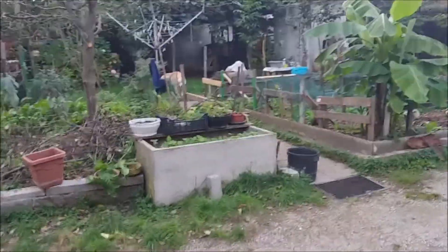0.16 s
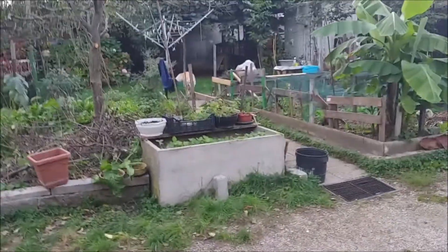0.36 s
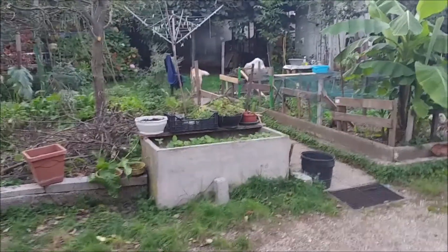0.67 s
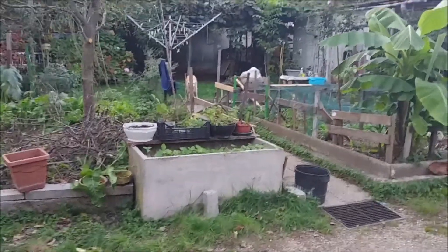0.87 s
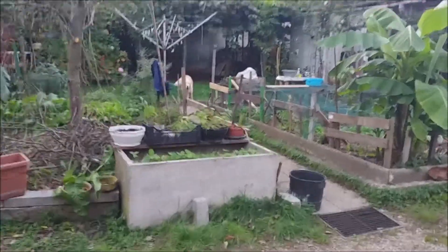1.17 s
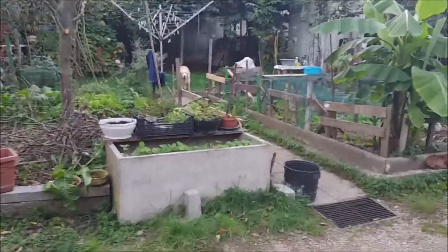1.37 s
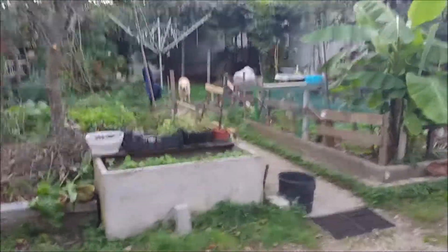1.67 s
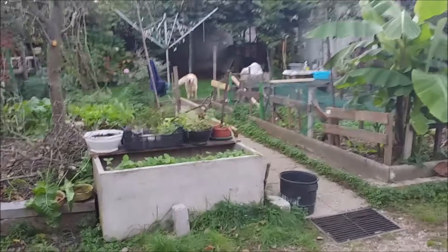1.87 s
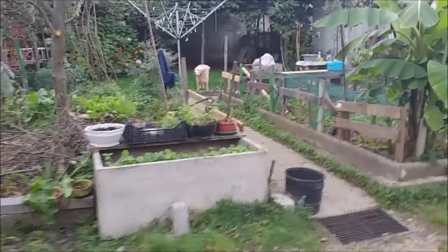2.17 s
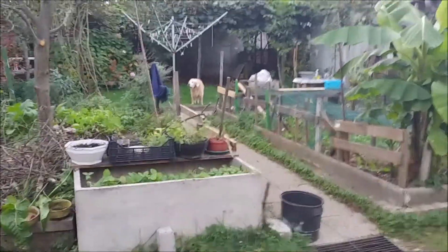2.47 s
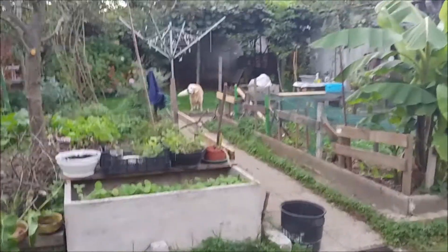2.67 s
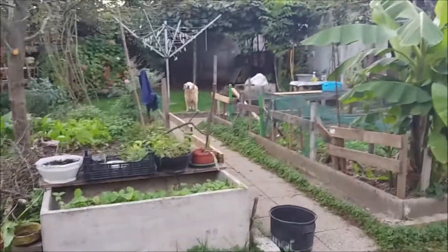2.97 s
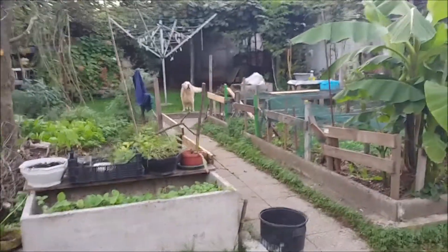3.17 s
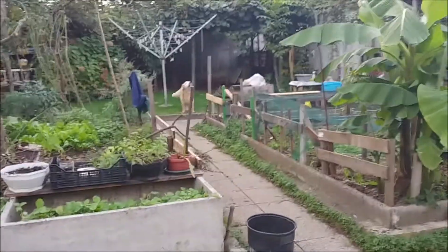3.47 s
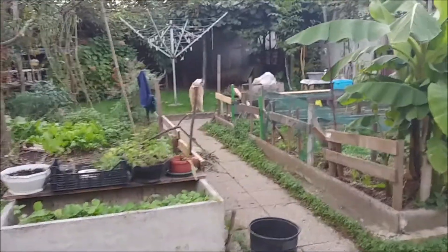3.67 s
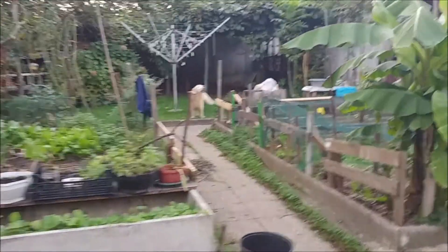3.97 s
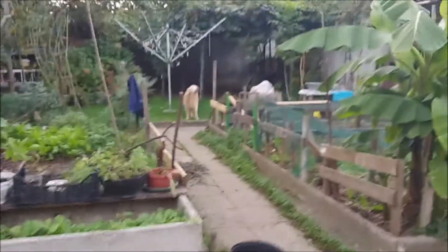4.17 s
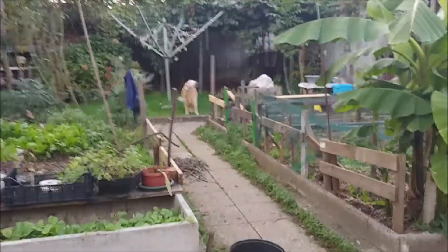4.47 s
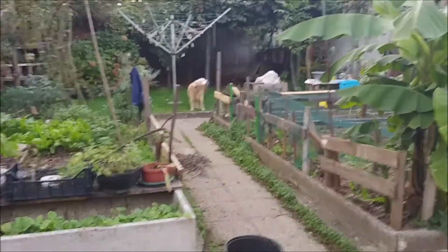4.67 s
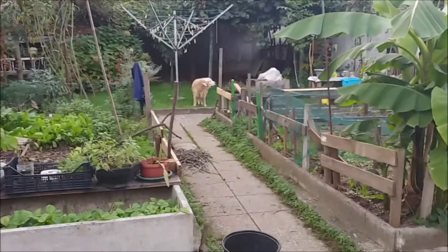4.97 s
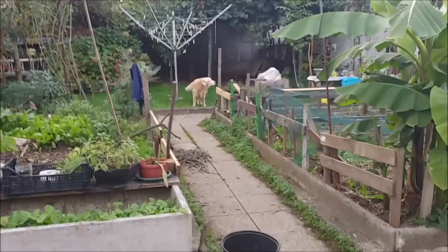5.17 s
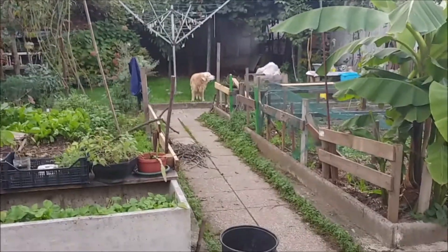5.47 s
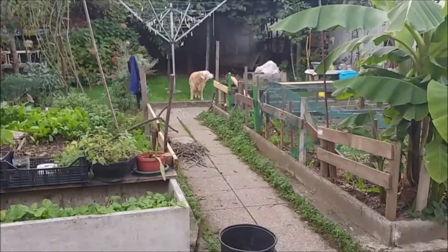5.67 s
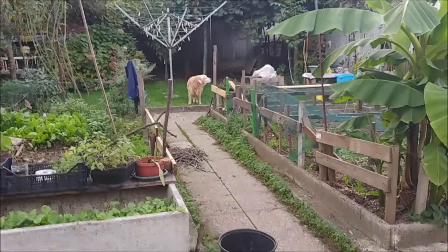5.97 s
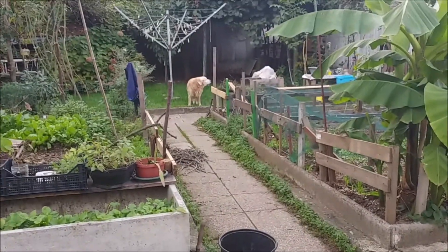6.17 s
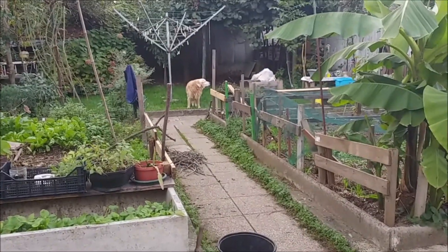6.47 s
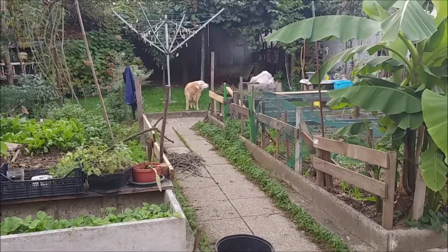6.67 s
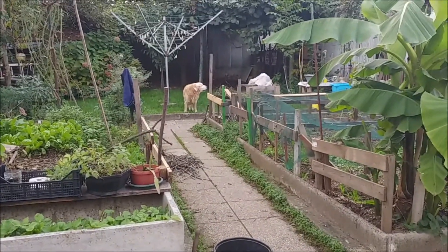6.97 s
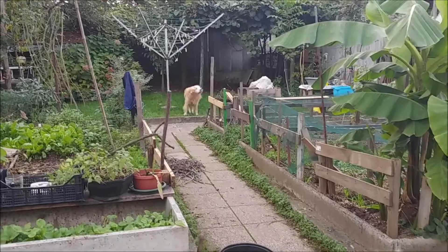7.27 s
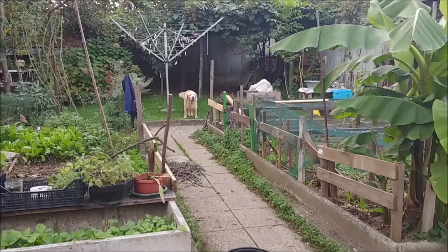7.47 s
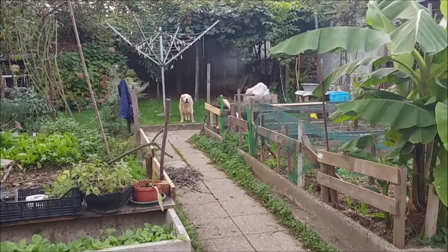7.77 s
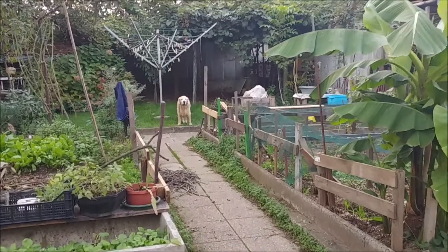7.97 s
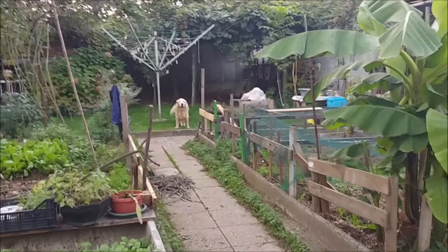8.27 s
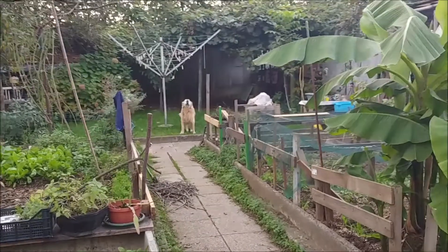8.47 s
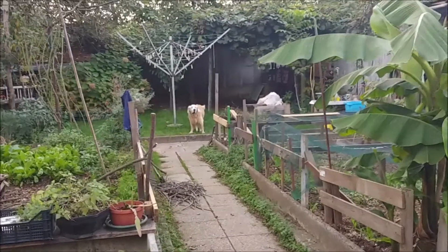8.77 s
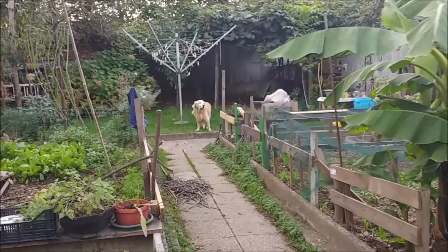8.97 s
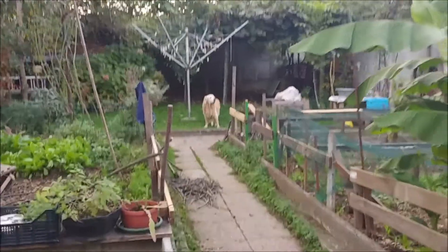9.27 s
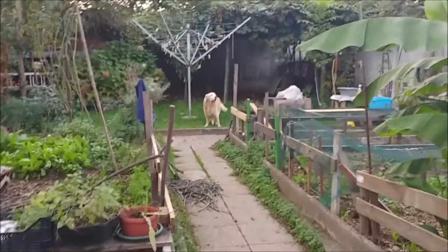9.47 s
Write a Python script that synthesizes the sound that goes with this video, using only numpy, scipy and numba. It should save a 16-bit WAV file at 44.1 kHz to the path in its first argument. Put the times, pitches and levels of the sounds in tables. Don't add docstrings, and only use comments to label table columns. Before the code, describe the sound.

Six hoarse, echoing dog barks across a back garden, over footsteps on gravel, low traffic rumble, a climbing lorry engine and small bird chips.

```python
import sys
import numpy as np
from scipy import signal
from scipy.fft import rfft, irfft, next_fast_len
from scipy.io import wavfile
from scipy.ndimage import uniform_filter1d, minimum_filter1d
from numba import njit

SR = 44100
rng = np.random.default_rng(int(sys.argv[2]) if len(sys.argv) > 2 else 0)


def wav_out(sig):
    wavfile.write(sys.argv[1], SR, np.round(np.clip(np.atleast_2d(sig).T, -1, 1) * 32767).astype(np.int16))


def decibels_to_gain(level_db):
    exponent = np.asarray(level_db, float) / 20
    return 10 ** exponent


N = 423801
ROAD_LAG = 20

# time in seconds, level in dB.
LORRY = [(0.8, -50.5), (1.32, -28), (1.94, -35), (2.4, -28), (2.8, -34), (3.31, -36), (3.75, -33.5),
         (4.0, -33), (4.5, -41), (4.85, -44.5), (5.05, -60), (6.1, -49.5), (6.6, -31), (7.1, -31.5),
         (7.5, -33.5), (8.2, -36), (9.6, -52)]


def level(x, db):
    return x * decibels_to_gain(db) / np.sqrt(np.mean(x ** 2))


def curve(rows, column):
    rows = np.array(rows)
    return np.interp(np.arange(N) / SR, rows[:, 0], rows[:, column])


def walk(rate):
    hold = int(SR / rate)
    steps = np.repeat(rng.standard_normal(N // hold + 1), hold)
    return 1.5 * uniform_filter1d(uniform_filter1d(steps, hold), hold)[:N]


def late(x, samples):
    return np.concatenate([np.zeros(samples), x[:len(x) - samples]])


def add(out, s, piece):
    first = int(s * SR)
    out[first:first + len(piece)] += piece


@njit
def svf(x, hz, width):
    y, band, low = np.empty(len(x)), 0., 0.
    for i in range(len(x)):
        g, k = np.tan(np.pi * hz[i] / SR), width / hz[i]
        v = (band + g * (x[i] - low)) / (1 + g * (g + k))
        band, low, y[i] = 2 * v - band, low + 2 * g * v, k * v
    return y


def body(x, modes, shift=1, order=2):
    out = 0
    for k, (hz, width, db) in enumerate(modes):
        y = x
        for _ in range(order):
            y = svf(y, hz * shift * np.ones(len(x)), 1. * width)
        out = out + (-1) ** k * decibels_to_gain(db) * y / np.sqrt(width)
    return out


def town():
    # frequency in Hz, level in dB per Hz.
    spectrum = [(15, -52.5), (25, -33.5), (36, -13.5), (55, 2), (72, 0.5), (92, -11), (134, -15.5),
                (405, -25), (451, -16), (1020, -21), (1260, -30.5), (2220, -37.5), (3520, -45.5),
                (10700, -56), (16000, -71.5)]
    # time in seconds, wash level in dB.
    swells = [(0, 0.5), (.8, -0.5), (1.5, 1), (3.3, 4), (4.2, 3), (5, 2.5), (6, 0.5), (8, 1.5), (9.6, -1.5)]
    rumble_share = 0.11
    table, size = np.array(spectrum), next_fast_len(N)
    swell = .8 * walk(0.37) + curve(swells, 1)
    octave = np.log2(np.fft.rfftfreq(size, 1 / SR) + 1)
    road, *around = rng.standard_normal((3, size))
    spread = np.clip(0.11 * (octave - 5.9), .03, .95)
    wash = np.sqrt(1 - spread) * rfft(np.array([late(road, ROAD_LAG), road]))
    wash = wash + np.sqrt(spread) * rfft(np.array(around))
    wash = wash * decibels_to_gain(np.interp(octave, np.log2(table[:, 0]), table[:, 1]))
    wash = wash / (1 + (2 ** octave / 13500) ** 6)
    out = 0
    for centre in np.arange(4, 15):
        band = irfft(wash * np.clip(1 - np.abs(octave - centre), 0, 1), size)[:, :N]
        rumble = (centre < 9) * rumble_share * (curve(LORRY, 1) + 36.5)
        out = out + decibels_to_gain(swell + rumble + 0.82 * walk(6)) * band
    return level(out, -36.5)


def whine():
    # time in seconds, frequency in Hz.
    pitch = [(0, 10800), (.8, 10900), (1, 10500), (1.7, 10250), (2.4, 10150), (2.65, 10700), (3.1, 10560),
             (3.8, 10850), (4.2, 10350), (4.75, 10740), (5.05, 10520), (5.45, 10800), (5.75, 10550),
             (6.7, 10900), (7.3, 10920), (7.8, 10480), (9.1, 10350), (9.6, 10750)]
    drift_hz, fuzz_hz = 90, 110
    hz = curve(pitch, 1) + drift_hz * walk(8.6) + fuzz_hz * walk(150)
    return decibels_to_gain(-82 + 2.1 * walk(30)) * np.sqrt(2) * np.sin(2 * np.pi * np.cumsum(hz) / SR)


def shoes():
    # start in seconds, peak in dB, ring in Hz.
    stones = [(0.156, -35.5, 600), (0.205, -46, 646), (0.711, -41, 650), (0.773, -38, 633),
              (0.786, -32, 580), (0.8, -25.5, 618), (0.849, -28.5, 1425), (0.917, -36, 686),
              (1.0, -36.5, 750), (1.557, -26.5, 571), (1.583, -38, 713), (1.716, -37, 600),
              (2.302, -35, 613), (2.335, -37, 780), (2.362, -40, 580), (3.382, -44, 621.5),
              (3.393, -39, 610), (3.455, -36, 528.3), (3.973, -35, 486), (4.447, -20, 640),
              (4.455, -16, 680), (4.468, -18, 558), (4.477, -20.5, 640), (7.104, -39, 553.8),
              (7.603, -40.5, 550), (7.987, -40, 590), (8.182, -37.5, 563), (9.16, -39, 584),
              (9.388, -34, 1400), (9.445, -43, 606)]
    # start in seconds, peak in dB, centre in Hz, width in Hz.
    ticks = [(0.417, -39.5, 3220, 2500), (0.736, -47, 3070, 400), (0.7734, -39.5, 1500, 1990),
             (0.8488, -39.5, 1800, 2500), (.9178, -37.5, 1390, 1980), (1.012, -41.5, 1970, 2000),
             (1.1282, -45, 2980, 2500), (1.4174, -39, 3450, 4080), (1.5493, -31.5, 2000, 2500),
             (1.571, -36.5, 3000, 2500), (1.7174, -41, 1800, 2500), (1.744, -36, 1110, 700),
             (1.7845, -31, 2500, 14000), (2.3009, -40.5, 1500, 1500), (2.399, -38.5, 1500, 1500),
             (3.1692, -45, 2470, 2500), (3.2775, -39, 1689, 1500), (3.401, -30, 1200, 1190),
             (7.554, -29.5, 1520, 3380), (9.1635, -31, 1180, 870), (3.803, -40, 1500, 1500),
             (1.265, -45, 1200, 900), (9.3586, -50, 1393, 900), (9.3881, -39.5, 1500, 1500)]
    # start in seconds, length in seconds, level in dB, grains a second, scuff in dB.
    steps = [(0.006, 0.2, -57, 4500, 7.5), (0.708, 0.074, -52, 3400, -3), (0.769, 0.049, -41, 5400, -6),
             (0.841, 0.063, -49.5, 4000, -1), (0.899, 0.058, -50, 3000, -4), (1.525, 0.11, -46, 4500, 3.5),
             (1.631, 0.13, -49, 2400, -3), (2.274, 0.21, -50, 5000, -1.5), (3.079, 0.154, -49.5, 5100, -2),
             (3.375, 0.068, -42.5, 4400, 0.5), (3.938, .14, -51.5, 2600, 0),
             (4.444, 0.058, -40, 15000, -1.5), (9.07, 0.14, -54.5, 2100, -3)]
    # frequency in Hz, width in Hz, level in dB.
    gravel = [(650, 1000, 25.5), (1500, 1200, -5)]
    # frequency in Hz, width in Hz, level in dB.
    sole = [(3300, 7500, 6.5), (7480, 1800, 8), (10500, 2000, -15)]
    out, t = np.zeros(N), np.arange(900) / SR
    for s, db, hz in stones:
        knock = np.sin(2 * np.pi * hz * t) * np.exp(-t * hz / 2.53) * (1 - np.exp(-t / 0.00048))
        add(out, s, decibels_to_gain(db + 2.5) * knock)
    for s, db, hz, width in ticks:
        snap = np.exp(-t * 2 * np.pi * (hz + width / 2))
        grit = 0.11 * rng.standard_normal(len(t)) * np.exp(-t / 0.0014)
        tick = body(snap + grit, [(hz, max(width, 200), 0)])
        add(out, s, decibels_to_gain(db) * tick / np.abs(tick).max())
    size = decibels_to_gain(2.2 * rng.exponential(size=N)) * rng.standard_normal(N)
    luck, crunch, scuff = rng.random(N), np.zeros(N), np.zeros(N)
    for s, length, db, rate, scuff_db in steps:
        u = np.clip((np.arange(N) / SR - s) / length, 0, 1)
        weight = np.sqrt(np.sin(np.pi * u) / rate + 1e-18)
        grains = decibels_to_gain(db) * weight * size * (luck < rate / SR)
        crunch = crunch + grains
        scuff = scuff + decibels_to_gain(scuff_db) * grains
    return out + decibels_to_gain(2.8 * walk(60)) * 1200 * (body(crunch, gravel) + body(scuff, sole))


def lorry():
    # start in seconds, length in seconds, firing rate in Hz at the start, at the end.
    gears = [
        (0.797, 3.11, 54, 84),
        (3.8, 1.38, 72.5, 84),
        (6.103, 3.5, 53, 88),
    ]
    # multiple of the firing rate, level in dB.
    orders = [(1, 1.5), (.9, -4.5), (2, -22.5), (3.1, -28)]
    t, table = np.arange(N) / SR, np.array(gears)
    gear = np.maximum(np.searchsorted(table[:, 0], t) - 1, 0)
    start, length, low_hz, high_hz = table[gear].T
    left_to_climb = np.clip(1 - (t - start) / length, 0, 1) ** 1.4
    turns = np.cumsum(high_hz - (high_hz - low_hz) * left_to_climb) / SR
    tones = 0
    for k, db in orders:
        swell = decibels_to_gain(db + 3.4 * walk(9))
        tones = tones + swell * np.sin(2 * np.pi * k * turns + 1.41 * k * walk(4.5))
    return level(tones, 0) * decibels_to_gain(curve(LORRY, 1))


def bird():
    # start in seconds, length in seconds, edge pitch in Hz, top pitch in Hz, level in dB.
    chips = [
        (1.47, .026, 4600, 5230, -66.5),
        (5.876, 0.026, 3930, 5280, -65),
        (6.424, 0.031, 3836, 5230, -63.5),
        (6.589, 0.065, 3461, 3564, -69),
        (7.545, 0.026, 4260, 5270, -57),
        (9.013, .018, 4950, 5160, -63),
    ]
    out = np.zeros(N)
    for s, length, edge_hz, top_hz, db in chips:
        arch = np.sin(np.pi * np.linspace(0, 1, int(length * SR)))
        n = len(arch)
        hz = edge_hz + (top_hz - edge_hz) * arch ** 0.9 + 180 * walk(460)[:n]
        swell = decibels_to_gain(db) * np.sqrt(2) * arch ** 0.28 * decibels_to_gain(2.8 * walk(300)[:n])
        add(out, s, swell * np.sin(2 * np.pi * np.cumsum(hz) / SR))
    return out + 0.39 * late(out, int(.019 * SR))


def squeaks():
    # start in seconds, length in seconds, start pitch in Hz, end pitch in Hz, level in dB.
    glides = [
        (1.872, 0.045, 478.6, 636, -23.5),
        (3.466, 0.081, 500, 522, -30.5),
        (7.125, 0.023, 524.4, 556, -24.5),
        (8.356, 0.046, 524, 597.6, -33.5),
    ]
    out = np.zeros(N)
    for s, length, hz0, hz1, db in glides:
        u = np.linspace(0, 1, int(length * SR))
        tone = np.sin(2 * np.pi * np.cumsum(hz0 + (hz1 - hz0) * u) / SR)
        add(out, s, decibels_to_gain(db) * np.sqrt(2) * np.sin(np.pi * u) * tone)
    return out


def effort():
    # start in seconds, climb in seconds, first fold rate in Hz, top fold rate in Hz, fundamental in dB.
    barks = [(1.887, 0.079, 345.1, 460.6, -4.5), (2.817, 0.079, 389.5, 470.6, -2),
             (3.503, .095, 330.1, 457.4, -3.5), (4.502, .075, 320, 460.1, -0.5),
             (7.122, 0.1, 335.1, 457.4, -3), (8.386, .085, 334.9, 478.8, -2.5)]
    hoarseness = [(.8, .55, .2, .3), (.15, .5, .15, .4), (.5, .6, .3, .5), (.15, .2, .45, .4),
                  (.9, .7, .12, .35), (.15, .2, .08, .2)]
    # hold in seconds, pitch sag in Hz per s squared, seconds by which the low ring fades early,
    # droop in the hold in dB per s.
    endings = [(.025, 6000, -0.0064, 30), (.04, 1500, -0.0018, 58), (.03, 5000, 0.033, 79),
               (.05, 4000, 0.0025, 129), (.012, 6000, -0.0047, 10), (0.033, 16000, 0.042, 4)]
    # low mouth ring in dB, high mouth ring in dB, breath in dB,
    # breath tilt in dB per octave.
    mouths = [(-6, -10.5, -26, -7.5), (-9, -12, -33.5, -4), (-2.5, -9, -26, 0), (-11, -10.5, -34, 3),
              (-4, -16.5, -30, -4), (-4.5, -9, -29.5, 1)]
    # dB lost per unit of pitch short of the top, attack in seconds, seconds by which it fades early,
    # fade in dB per s, dB lost when fully hoarse.
    layers = [
        (85, 0.0056, 0.0023, 480, 5),
        (59, .02, 0.0009, 299, 13),
        (24.8, 0.018, 0.031, 480.5, 4),
        (50, .05, 0.032, 290, 3.2),
    ]
    attack_db, release_s = 17, .06
    t = np.arange(N) / SR
    k = np.maximum(np.searchsorted(np.array(barks)[:, 0] - .1, t) - 1, 0)
    start, climb, first_hz, top_hz, db = np.array(barks)[k].T
    hold, sag, closing, droop = np.array(endings)[k].T
    *tone_db, tilt = np.array(mouths)[k].T
    age = t - start
    past = age - climb - hold
    short = (1 - first_hz / top_hz) * np.clip(1 - age / climb, 0, 1) ** 2.1
    hz = top_hz * (1 - short) - sag * np.clip(age - climb, 0, hold + release_s) ** 2
    stages = []
    for (s, rise, *_), row in zip(barks, hoarseness):
        stages += [(s + share * rise, r) for share, r in zip((0, .7, .85, 1.7), row)]
    rough = curve(stages, 1)
    db = db - droop * np.clip(age - climb, 0, hold)
    levels = []
    for tone, shut, row in zip([0, *tone_db], [0, closing, 0, 0], layers):
        loss, attack, early, fade, hoarse_db = row
        layer_db = db + tone - hoarse_db * rough - loss * short
        layer_db = layer_db - attack_db * np.clip(1 - age / attack, 0, 1)
        levels.append(layer_db - fade * np.clip(past + early + shut, 0, .2))
    gate = np.clip(age / .006 + 1, 0, 1) * np.clip((release_s - past) / .035 + 1, 0, 1)
    return hz, rough, tilt, gate, levels


def dog():
    # frequency in Hz, width in Hz, level in dB.
    throat = [(500, 950, 0)]
    mouth_low = [(850, 240, 0)]
    mouth_high = [(1286, 305, 5), (2260, 300, -21.5), (2560, 540, -20)]
    breath = [(3730, 330, -8), (4440, 500, -4), (5240, 590, -7), (6430, 840, 1.5), (7480, 690, -4.5),
              (10000, 1100, -8), (11770, 730, -11.5), (13300, 1700, -11), (15000, 2000, -7)]
    # multiple of the pocket pitch, width in Hz.
    notches = [(1, 600), (1, 587), (2.75, 399)]
    # time in seconds, pocket in Hz.
    pocket = [(1.95, 3700), (2.9, 3640), (3.58, 3740), (4.6, 3300), (7.2, 3480), (8.45, 3470)]
    hz, rough, tilt, gate, (voice_db, low_db, high_db, breath_db) = effort()
    phase = 2 * np.pi * np.cumsum(hz * (1 + 0.08 * rough * walk(160))) / SR
    uneven = 1 + 1.2 * rough * np.cos(phase / 2)
    puff = np.maximum(np.cos(phase), 0) * rng.standard_normal(N)
    opening = np.clip((uniform_filter1d(hz, 900) / 460) ** 1.51, .6, 1.1)
    overtones = 0
    for k in range(2, 7):
        flutter = decibels_to_gain((2 + 6 * rough) * walk(45))
        overtones = overtones + flutter * np.cos(k * phase + (.3 + rough) * walk(70))
    overtones = overtones * uneven + (3 + 26 * rough) * puff
    rasp = 1.06 * rough * level(body(puff, [(488.0, 189, 0)]), 0)
    first = decibels_to_gain(9.7 * rough * walk(90)) * np.sin(phase) + rasp
    voice = decibels_to_gain(voice_db) * level(body(first, throat, order=1), 0)
    voice = voice + decibels_to_gain(low_db) * level(body(overtones, mouth_low), 0)
    voice = voice + decibels_to_gain(high_db) * level(body(overtones, mouth_high, opening ** 0.53), 0)
    voice = signal.sosfilt(signal.butter(6, 340, "high", fs=SR, output="sos"), voice)
    edge = .07 * sum(np.cos(k * phase) for k in range(8, 18))
    left, right = edge + .8 * puff + .4 * rng.standard_normal((2, N))
    shift = opening ** 0.25 * (1 + 0.029 * walk(4))
    hiss = 0
    for band in breath:
        tilt_db = tilt * np.log2(min(band[0], 7000) / 6000)
        patchy = decibels_to_gain(2.2 * walk(25) + tilt_db + 1.8 * walk(120))
        quarter_cycle = round(SR / 4 / band[0])
        ports = [late(body(left, [band], shift), quarter_cycle), body(right, [band], shift)]
        hiss = hiss + patchy * np.array(ports)
    voice = voice + decibels_to_gain(breath_db + np.array([[.9], [-.9]])) * level(hiss, 0)
    for multiple, width in notches:
        centre = multiple * curve(pocket, 1) * opening ** (1.0 / multiple)
        voice = voice - np.array([svf(port, centre, 1. * width) for port in voice])
    return voice * gate + squeaks()


@njit
def walls(x, lags, gain, damp):
    line, soft, out = np.zeros((8, 4096)), np.zeros(8), np.zeros((2, len(x)))
    for i in range(len(x)):
        total = 0.
        for k in range(8):
            soft[k] += (1 - damp) * (gain[k] * line[k, (i - lags[k]) & 4095] - soft[k])
            total += soft[k]
            out[k % 2, i] += soft[k]
        for k in range(8):
            line[k, i & 4095] = x[i] + soft[k] - total / 4
    return out


def garden(x):
    # delay in seconds, level in dB, left minus right in dB.
    echoes = [(.009, -15.5, -4.5), (.017, -6, 4), (.033, -13, -3.5), (.047, -15, 4), (.098, -21.5, 4),
              (.165, -31, -6), (.21, -34.5, 1)]
    tail_db, t60_s, damp = -12, 0.37, 0.53
    foliage = signal.butter(1, 5000, fs=SR, output="sos")
    out, mono = x, signal.sosfilt(foliage, x.mean(axis=0))
    for s, db, pan_db in echoes:
        lag = int(s * SR)
        ports = np.array([late(mono, lag), late(mono, lag + int(3 * pan_db))])
        out = out + decibels_to_gain(db + np.array([[pan_db], [-pan_db]]) / 2) * ports
    lags = rng.integers(500, 3000, 8)
    return out + decibels_to_gain(tail_db) * walls(mono + 1e-18, lags, decibels_to_gain(-60 * lags / SR / t60_s), damp)


def scene():
    near, road = shoes(), lorry()
    near = np.array([near, late(near, 2)])
    far = garden(dog() + 0.68 * near) + bird()
    return far + 1.24 * near + np.array([late(road, ROAD_LAG), road]) + town() + whine()


def top_cut(x):
    return signal.sosfilt(signal.butter(12, 16500, fs=SR, output="sos"), x)


def record(dry):
    left = signal.sosfilt(signal.butter(1, 179, "high", fs=SR, output="sos"), dry[0])
    left = left + (decibels_to_gain(0.5) - 1) * svf(left, np.full(N, 9000.), 3600.0)
    both = signal.sosfilt(signal.butter(3, 38, "high", fs=SR, output="sos"), [left, dry[1]])
    ceiling, window = .97, 441
    room = np.minimum(ceiling / (np.abs(both).max(axis=0) + 1e-9), 1)
    both = both * uniform_filter1d(minimum_filter1d(room, size=window), size=window)
    return top_cut(both)


dry = scene()
out = record(dry)
wav_out(out)
```